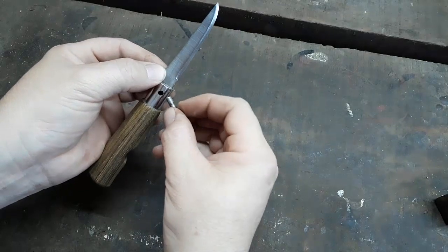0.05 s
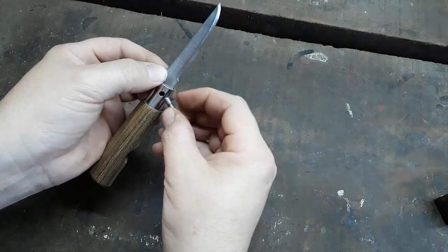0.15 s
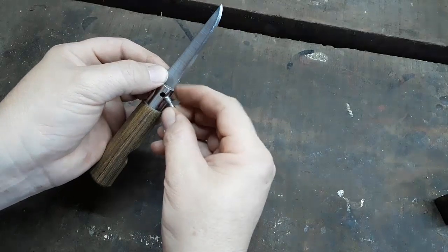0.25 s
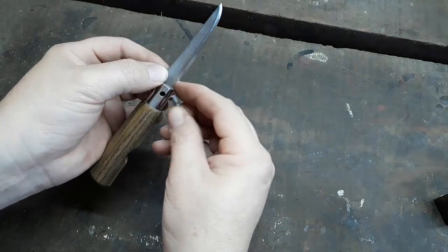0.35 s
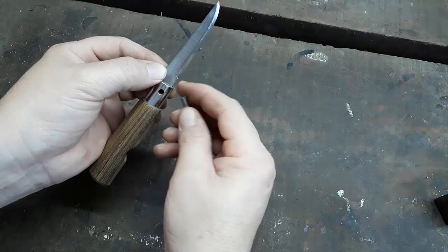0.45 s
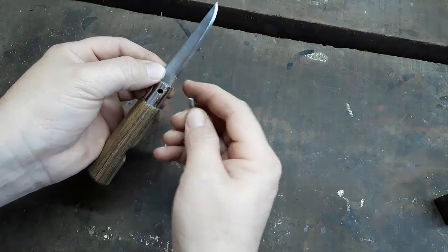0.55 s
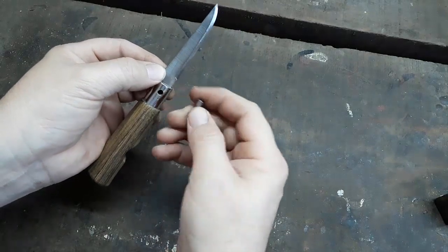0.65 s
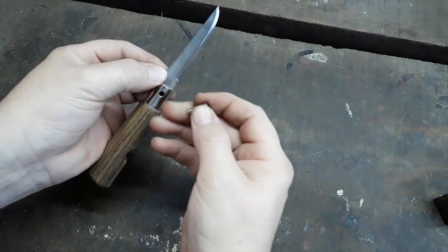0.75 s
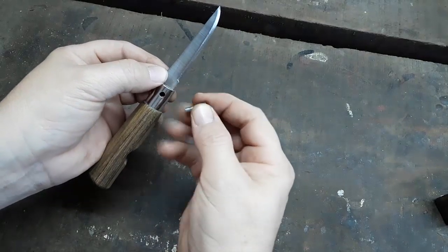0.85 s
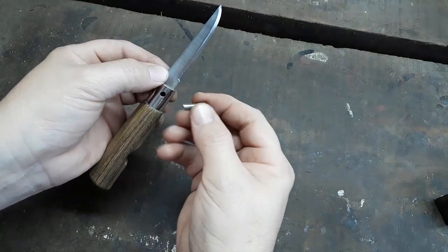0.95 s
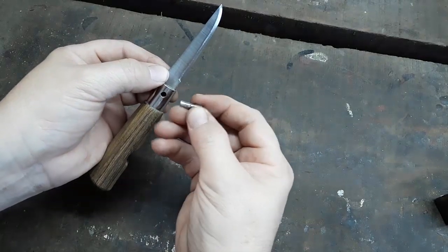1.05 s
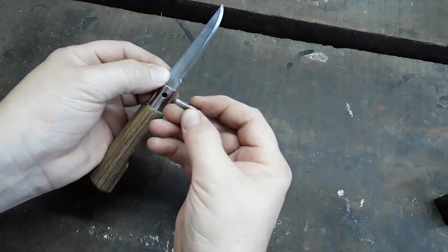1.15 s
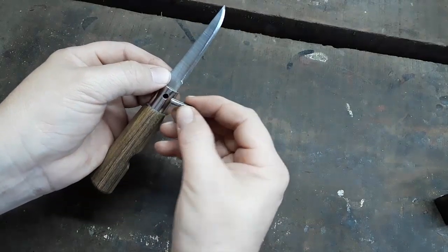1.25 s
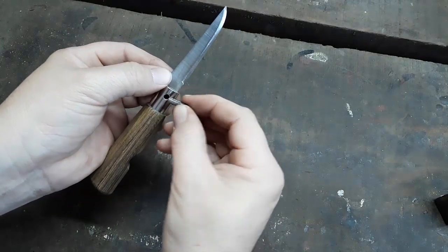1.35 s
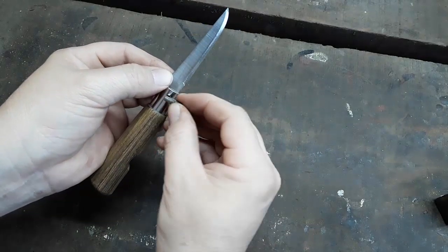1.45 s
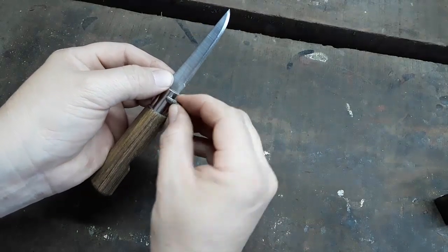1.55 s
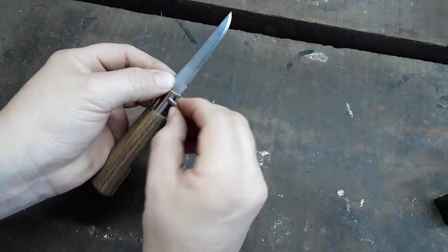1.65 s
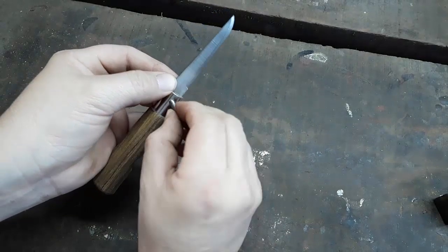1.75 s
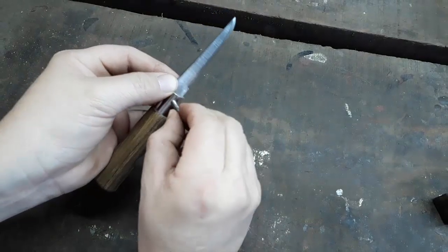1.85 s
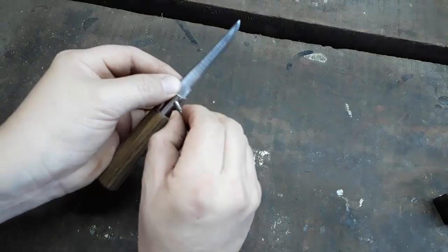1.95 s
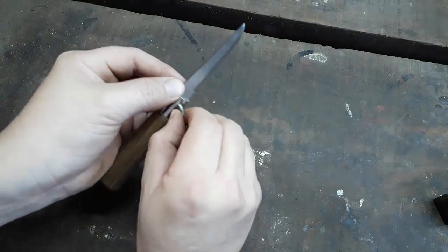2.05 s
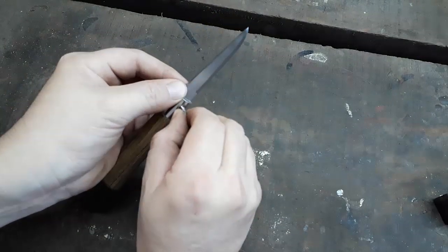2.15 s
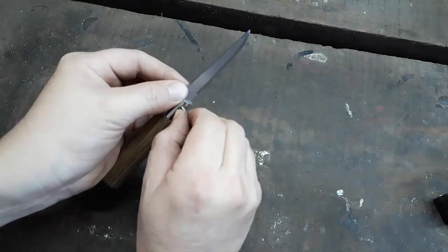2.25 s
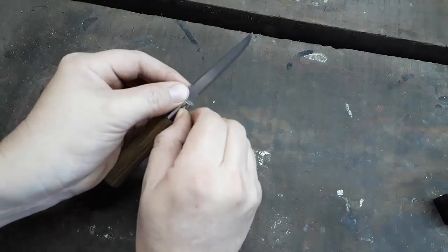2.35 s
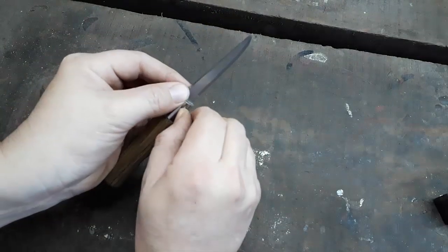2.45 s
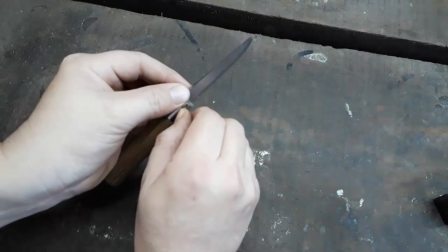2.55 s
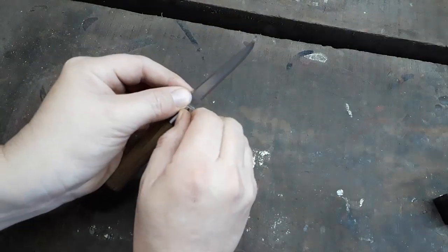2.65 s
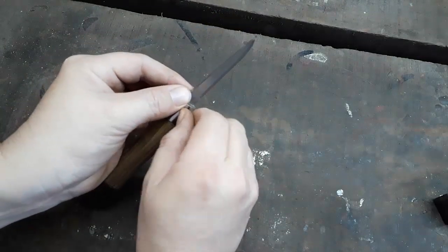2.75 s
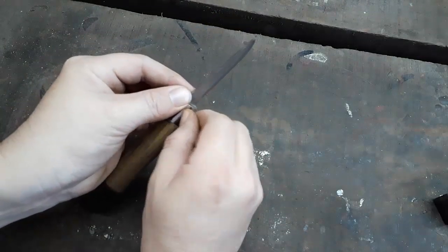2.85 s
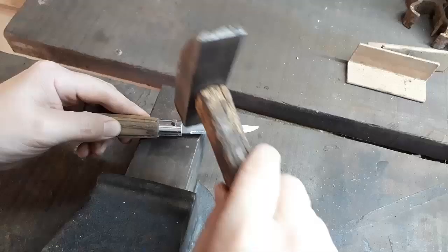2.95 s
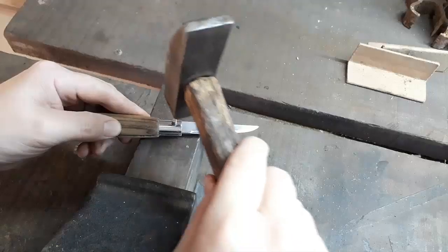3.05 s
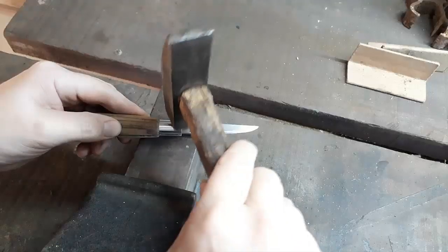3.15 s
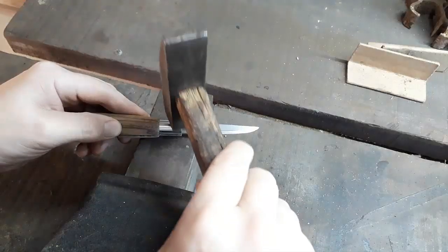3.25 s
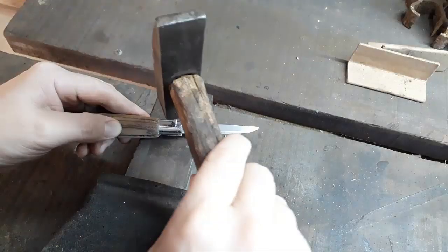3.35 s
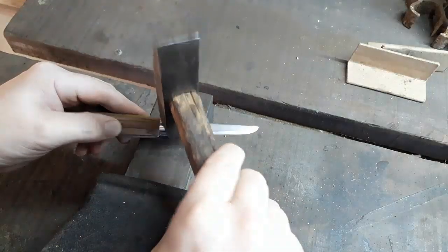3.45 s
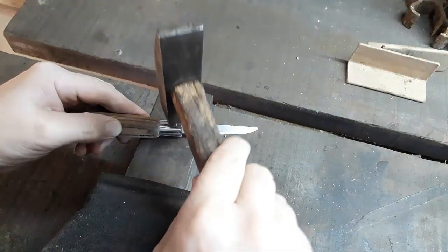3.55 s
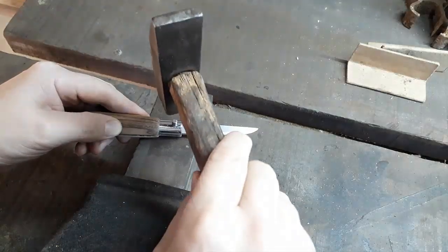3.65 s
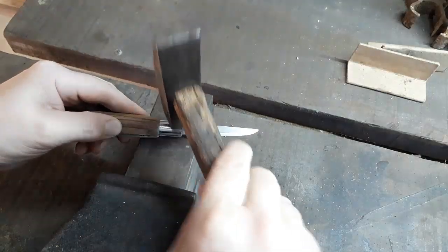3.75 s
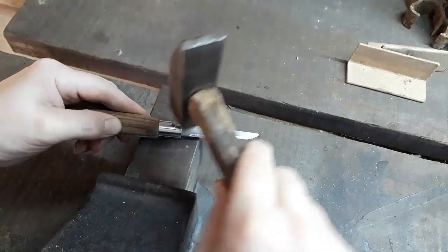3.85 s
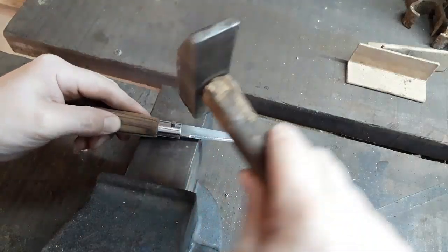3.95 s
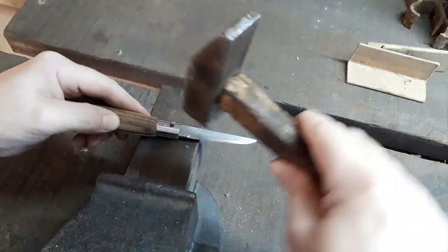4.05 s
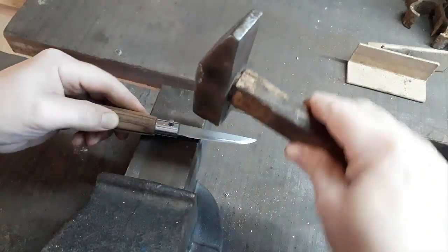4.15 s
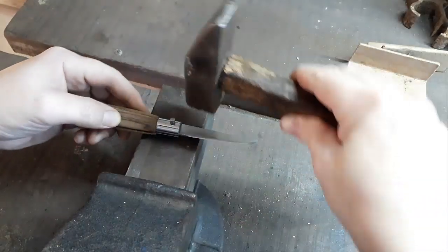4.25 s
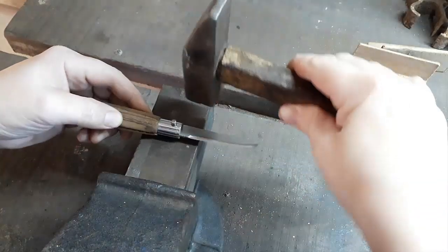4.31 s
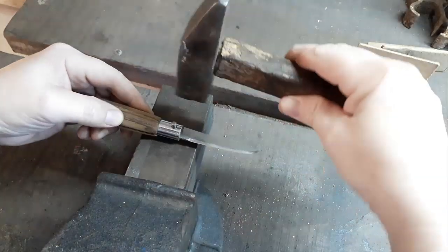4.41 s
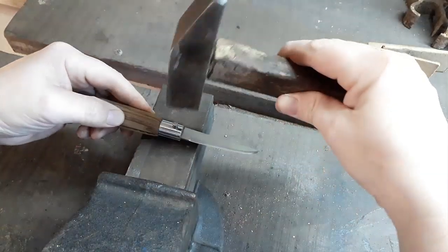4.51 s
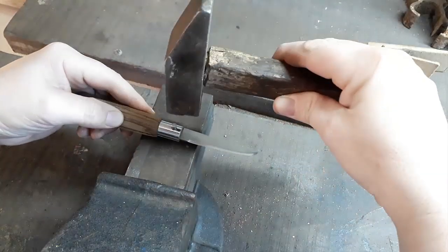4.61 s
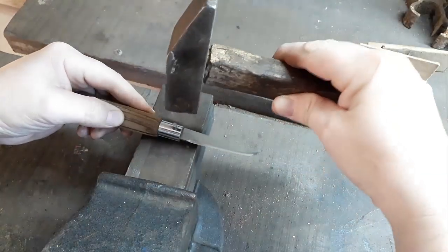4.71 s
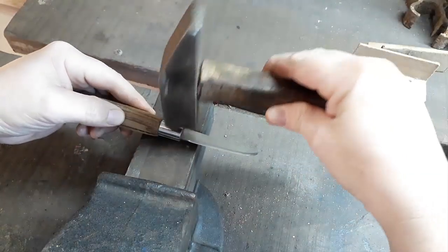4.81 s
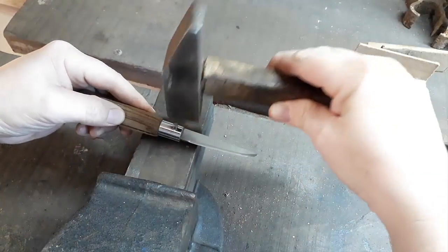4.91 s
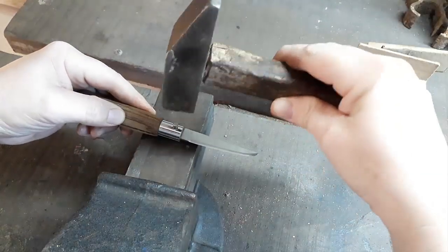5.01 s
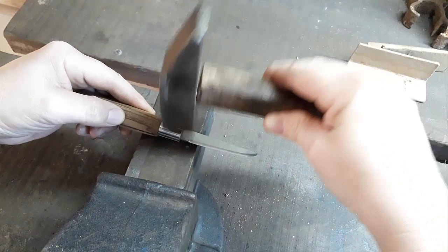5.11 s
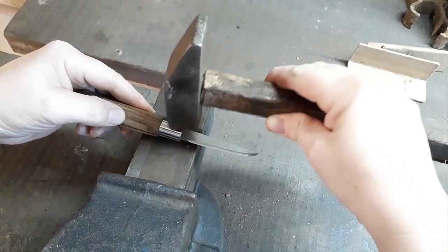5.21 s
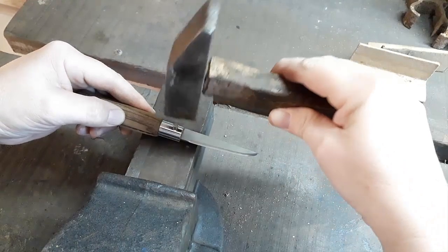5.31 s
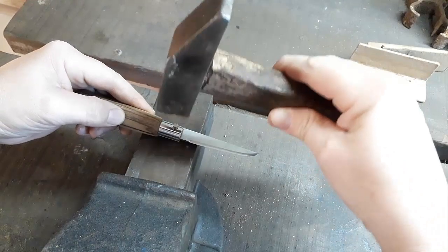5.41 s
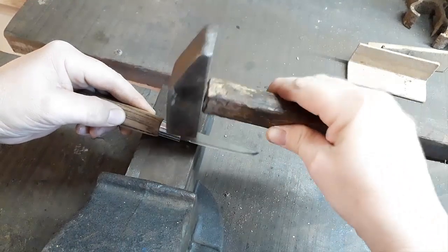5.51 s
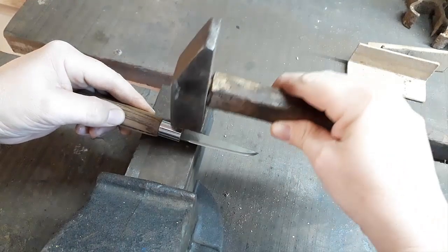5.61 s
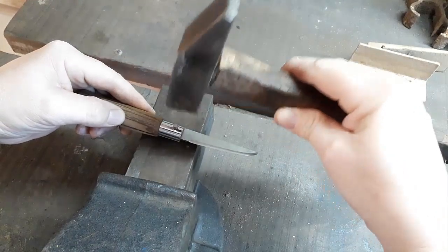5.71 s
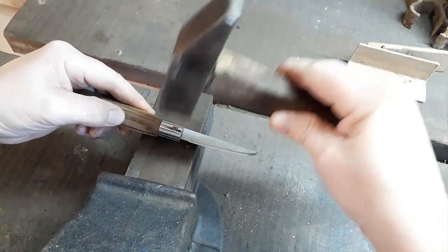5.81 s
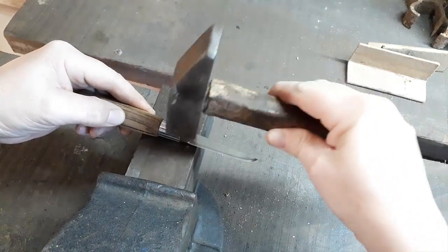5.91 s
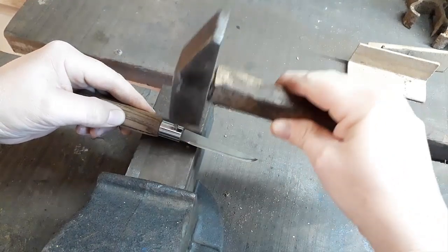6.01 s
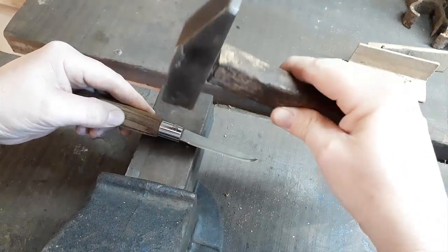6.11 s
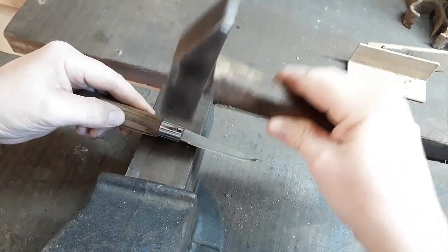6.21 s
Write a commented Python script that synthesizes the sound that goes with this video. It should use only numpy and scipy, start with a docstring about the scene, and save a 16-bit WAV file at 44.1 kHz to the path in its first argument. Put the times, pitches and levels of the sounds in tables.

```python
"""Hammering a pin into a folding knife

A metal pin is fiddled into the knife's collar with small clicks and scrapes, then hammered home on a
vise. Each impact excites the modes of all it reaches: the clamped steel cracks and chatters, the wooden
bench knocks and the vise rings on faintly. The small, quiet workshop adds a low rumble and faint chirps."""
import sys
import numpy as np
from scipy import signal
from scipy.fft import rfft, irfft, next_fast_len
from scipy.io import wavfile
from scipy.ndimage import uniform_filter1d, map_coordinates

SR = 44100
rng = np.random.default_rng(int(sys.argv[2]) if len(sys.argv) > 2 else 0)


def file_out(sig):
    """Save sig as 16-bit WAV at sys.argv[1]."""
    # one column per channel
    cols = np.atleast_2d(sig).T
    # limit, then scale
    lim = np.clip(cols, -1, 1)
    pcm = np.round(lim * 32767).astype(np.int16)
    wavfile.write(sys.argv[1], SR, pcm)


N = 276507
T = np.arange(int(.8 * SR)) / SR  # time axis of one event
HZ = np.fft.rfftfreq(len(T), 1 / SR)


def amp(db):
    """Amplitude grows tenfold every 20 dB."""
    return 10 ** (np.asarray(db) / 20)

def unit(x):
    """Normalisation to rms 1."""
    return x / np.sqrt(np.mean(x ** 2) + 1e-20)

def along(points, hz):
    """Interpolation of (Hz, value) points on a logarithmic frequency axis."""
    freqs, values = np.transpose(points)
    return np.interp(np.log(hz + 1), np.log(freqs + 1), values)

def tilt(db_per_octave):
    """Spectral slope in dB, pivoting near 6 kHz."""
    return db_per_octave * np.log2((HZ + 100) / 6000)

def ripple(width_hz):
    """Modal overlap: crowded modes leave random peaks and dips in a spectrum."""
    knots = HZ / width_hz
    return map_coordinates(rng.standard_normal(int(knots[-1]) + 4), [knots])

def fade(t60, t=T):
    """Exponential damping: 60 dB in t60 seconds."""
    return np.exp(-np.log(1000) * t / t60)

def swell(rise_s):
    """First-order onset with the given time constant."""
    return 1 - np.exp(-T / rise_s)

def noise(colour_db):
    """Random phases turn a spectrum into noise of rms 1."""
    return unit(irfft(amp(colour_db) * np.exp(2j * np.pi * rng.random(len(colour_db)))))

def pulse(colour_db):
    """Minimum phase turns a spectrum into its shortest causal click, of peak 1."""
    cepstrum = irfft(np.log(amp(colour_db)))
    click = irfft(np.exp(rfft(2 * cepstrum * (T < T[-1] / 2))))
    return click / np.abs(click).max()

def ring(modes):
    """Modal superposition: damped sines of alternating sign and slightly random strength."""
    hz, db, t60 = np.transpose(modes)[:, :, None]
    polarity = (-1) ** np.arange(len(hz))[:, None]
    gain = amp(db + rng.standard_normal(hz.shape)) * polarity
    return np.sum(gain * np.sin(2 * np.pi * hz * T) * fade(t60), axis=0)

def add(track, start_s, sound):
    """Linear superposition of a sound on a track."""
    part = track[round(start_s * SR):][:len(sound)]
    part += sound[:len(part)]

# Reverberation of the workshop. Each row: frequency in Hz, T60 in seconds.
ROOM_DECAY = [(100, 0.72), (300, 0.17), (700, 0.2), (2000, 0.32), (5500, 0.23), (9000, 0.21), (14000, 0.22)]
def room_decay(x):
    """Absorption depends on frequency, so each band dies away at its own rate."""
    hz, t, bands = signal.stft(x, SR, nperseg=256)
    damped = bands * fade(along(ROOM_DECAY, hz)[:, None], t)
    return signal.istft(damped, SR, nperseg=256)[1][:len(T)]

# Spectrum of the background. Each row: frequency in Hz, relative level in dB.
AIR_SPECTRUM = [(25, -21.5), (45, -17), (75, -3), (165, -1.5), (220, -10), (450, -13), (1200, -17),
                (1700, -21), (4000, -23), (6000, -31), (9000, -35), (15000, -34.5), (16000, -45)]
# Slow rise of the background. Each row: time in seconds, level in dB.
AIR_LEVEL = [(0, -69), (3.001, -69), (4.403, -66.5), (6.27, -66)]
def room_tone():
    """Broadband ambient noise: a low rumble and a thin hiss."""
    hz = np.fft.rfftfreq(2 * next_fast_len(N // 2 + 1), 1 / SR)
    level_db = np.interp(np.arange(N) / SR, *np.transpose(AIR_LEVEL))
    return amp(level_db) * noise(along(AIR_SPECTRUM, hz))[:N]

# Faint chirps. Each row: start and length in seconds, first and last pitch in Hz, level in dB.
CHIRP_GLIDES = [(0.638, 0.1, 1940, 2070, -75), (0.842, 0.073, 3180, 2920, -70),
                (0.916, 0.065, 4340, 3400, -63.5), (4.56, 0.11, 1950, 2050, -80)]
def chirps(rasp=.02, rasp_per_octave=0.097, subharmonic_db=-8.5):
    """Random frequency modulation roughens each glide, wide ones most; reverberation blurs them."""
    track = np.zeros(N)
    for start_s, length_s, first_hz, last_hz, db in CHIRP_GLIDES:
        n = int(length_s * SR)
        depth = rasp + rasp_per_octave * abs(np.log2(last_hz / first_hz))
        waver = depth * unit(uniform_filter1d(rng.standard_normal(len(T)), size=60))[:n]
        pitch = np.linspace(first_hz, last_hz, n) * (1 + waver)
        phase = 2 * np.pi * np.cumsum(pitch) / SR
        tone = np.sin(phase) + amp(subharmonic_db) * np.sin(phase / 2)
        add(track, start_s, amp(db) * tone * np.sin(np.linspace(0, np.pi, n)))
    tail = room_decay(rng.standard_normal(len(T)))
    return track + .5 * signal.fftconvolve(track, tail / np.linalg.norm(tail))[:N]

# Spectrum of steel, scraped or struck. Each row: frequency in Hz, relative level in dB.
STEEL_SPECTRUM = [(300, -22), (1500, -12.5), (2300, -15), (3700, -12), (4600, -3.5), (6200, 0),
                  (7900, -1.5), (9000, -5), (10300, -13), (12800, -14), (14800, -16.5), (15300, -12.5),
                  (16200, -30)]
# Light drags of steel on steel. Each row: start in seconds, length in seconds, level in dB.
SLIDE_STROKES = [(0.754, 0.083, -74.5), (1.44, 0.4, -86), (3.979, 0.13, -68.5), (4.099, 0.35, -83)]
def slides(catches_per_s=500):
    """Sliding friction: the surfaces catch in tiny random impulses that excite the steel."""
    track = np.zeros(N)
    for start_s, length_s, db in SLIDE_STROKES:
        n = min(int(length_s * SR), len(T))
        catches = rng.standard_normal(len(T)) * (rng.random(len(T)) < catches_per_s / SR)
        colour = along(STEEL_SPECTRUM, HZ) + 2 * ripple(width_hz=130)
        scrape = unit(irfft(rfft(catches) * amp(colour)))
        add(track, start_s, amp(db) * scrape[:n] * np.sin(np.linspace(0, np.pi, n)))
    return track

# Spectrum of knocked wood. Each row: frequency in Hz, relative level in dB.
WOOD_SPECTRUM = [(30, -32), (70, -9), (170, -6.5), (330, 5), (720, -1), (880, -5), (1300, -7.5),
                 (1900, -21.5), (3000, -20), (6000, -33.5)]
def wood_noise(shading_db=0):
    """The broad, overlapping resonances of wood merge into dull noise."""
    return noise(along(WOOD_SPECTRUM, HZ) + shading_db)

# Spectrum of the pin's click. Each row: frequency in Hz, relative level in dB.
PIN_SPECTRUM = [(100, -38), (400, -26), (1700, -22), (2500, -13), (3800, -6), (4800, -7), (6000, -4),
                (7300, 3), (8500, -8), (11000, -16), (15500, -21)]
# Light contacts of pin, knife and hammer. Each row: time in seconds, strength in dB.
LIGHT_CONTACTS = [(0.775, -54), (1.5986, -45.5), (1.8057, -58), (1.928, -39.5), (2.0686, -29.5),
                  (2.1339, -43.5), (2.6432, -22.5), (2.9698, -62), (4.5024, -57)]
def touches(graze_s=0.0034, blade_hz=3970, blade_half_width_hz=210):
    """Light impacts, damped by the fingers: the harder the contact, the brighter its click."""
    track = np.zeros(N)
    blade_resonance = -20 * np.log10(1 + ((HZ - blade_hz) / blade_half_width_hz) ** 2)
    for start_s, db in LIGHT_CONTACTS:
        colour = along(PIN_SPECTRUM, HZ) + tilt(0.08 * (db + 13)) + 2.5 * ripple(width_hz=130)
        for early_s, contact_db in [(graze_s, -19.5), (0, -7.5)]:  # the parts graze, then meet
            click = amp(1.5) * noise(colour) * fade(0.035) * swell(0.00038)
            reverberation = amp(-19) * room_decay(noise(colour))
            add(track, start_s - early_s, amp(db + contact_db) * (click + reverberation))
        handle = amp(-31) * wood_noise(tilt(3)) * fade(0.056)
        free_blade = amp(-28) * noise(blade_resonance) * fade(0.16)
        add(track, start_s, amp(db) * (handle + free_blade))
    return track

# Clear modes of the vise. Each row: frequency in Hz, relative level in dB, T60 in seconds.
VISE_MODES = [(701, 2, .9), (910, -1, 1.1), (1140, -4, .8), (1290, -3, .8), (1437, 1, 1.1), (1550, -3, 1),
              (1820, -8, 1), (2089, -3, 1), (2159, -4, 1), (2309, -4, 1), (2503, -3, 1), (2654, -7, 1),
              (3165, -6, .9), (3273, -8, .9), (4016, -9, .9), (5496, -11, .8), (6056, -12, .8)]
# Envelope of its crowd of other modes. Each row: frequency in Hz, relative level in dB.
VISE_SPECTRUM = [(600, 2.5), (1400, -1), (2400, 4.5), (3500, -9), (6000, -8.5)]
def vise_ring(count=70, crowd_t60_s=.6):
    """Free vibration of cast iron: a few clear modes outlast a crowd of others."""
    hz = np.geomspace(600, 6000, count) * (1 + .015 * rng.standard_normal(count))
    db = along(VISE_SPECTRUM, hz) + 3 * rng.standard_normal(count)
    crowd = np.transpose([hz, db, np.full(count, crowd_t60_s)])
    return (amp(-29) * ring(VISE_MODES) + amp(-31.5) * ring(crowd)) * swell(.004)

# Modes of the bench top. Each row: frequency in Hz, relative level in dB, free T60 in seconds.
TOP_MODES = [(322, -5, .16), (335, -.5, .17), (402, -7, .16), (470, -14, .14), (505, -13, .14),
             (628, -2, .14), (702, 2, .2), (745, 1, .15), (1112, -5, .21), (1225, -7, .18), (1283, -6, .18)]
# Low modes of the bench frame. Each row: frequency in Hz, relative level in dB, T60 in seconds.
FRAME_MODES = [(79.2, -17, 0.65), (91, -11, 0.48), (129, -7, 0.14), (142, -14.5, 0.24), (164.5, -3, .33),
               (186.8, -2.5, 0.31), (236.5, -7.5, .24), (293.6, -5, 0.18)]
def bench(knock_db, thump_db, centre_hz, boards, grip_t60_s=0.52):
    """Structure-borne sound: a blow passes through the vise, so the top knocks and the frame thumps."""
    favoured = [(hz, db - 6 * abs(np.log2(hz / centre_hz)), t60) for hz, db, t60 in TOP_MODES]
    top = amp(4) * ring(favoured) * swell(0.0064) * fade(grip_t60_s)  # the holding hand adds damping
    loose_parts = wood_noise(4 * ripple(width_hz=45))
    clatter = amp(-2.5) * unit(boards + 0.6 * loose_parts)
    frame = ring(FRAME_MODES) * swell(0.019)
    knock = top + room_decay(clatter) * swell(0.0015)
    build_up = np.interp(T, [.005, .008], [.6, 1])  # first reflections return through the bench
    return amp(knock_db) * knock * build_up + amp(thump_db) * frame

# Modes of the clamped knife. Each row: frequency in Hz, relative level in dB, T60 in seconds.
KNIFE_MODES = [(4686, 1, .13), (4916, -3, .13), (5259, -4, .16), (5336, -2, .18), (5563, -2, .15),
               (5905, 0, .14), (6210, -2, .14), (7190, -3, .12), (7850, -4, .12)]
def steel_clash(chatter_db, pin_hz, slope, pin_half_width_hz=300):
    """Impulsive excitation: the pin cracks, the knife rings briefly and chatter fills the room."""
    colour = along(STEEL_SPECTRUM, HZ) + tilt(slope)
    pin_resonance = 4 / (1 + ((HZ - pin_hz) / pin_half_width_hz) ** 2)
    resonant = colour + pin_resonance + 3 * ripple(width_hz=70)
    crack = amp(17.5) * pulse(colour) + amp(3.5) * noise(colour) * fade(.007) * swell(.0002)
    clash = amp(3) * noise(resonant) * fade(0.06) * swell(0.0005)
    knife = amp(chatter_db - 10) * ring(KNIFE_MODES) * swell(.002)
    chatter = amp(chatter_db - 2.5) * room_decay(noise(resonant)) * swell(0.0055)
    far_walls = amp(chatter_db - 26) * noise(resonant) * fade(0.6) * swell(.02)
    return crack + clash + knife + chatter + far_walls

# Modes of the hammer head. Each row: frequency in Hz, relative level in dB, T60 in seconds.
HEAD_MODES = [(9345, 0, .075), (11320, -17, .1), (13245, -16, .085), (15195, -8.5, .11)]
def hammer_ping():
    """A stiff, compact body has high natural frequencies: the head pings on a square hit."""
    return ring(HEAD_MODES) * swell(0.0022)

# Hammer blows, the faint one a rebound. Each row: start in seconds, strength in dB, firmness of the knife
# on the jaw from 0 to 1, ping in dB relative to strength, pin resonance in Hz, slope in dB per octave.
HAMMER_BLOWS = [(3.2302, -29.5, 0, -30, 7170, -2.1), (3.4887, -23, .8, -33, 5280, -4),
                (3.8135, -22.5, .85, -23, 4920, -2), (4.9169, -24, .3, -4.5, 4560, -2),
                (5.2025, -22, 1, 3, 5300, -2.5), (5.2815, -40.5, .3, -25, 5200, -3.5),
                (5.574, -21, .95, -6, 5900, -3), (5.945, -23, 1, -8, 4750, -2)]
def hammer_blows():
    """Mechanical coupling: the firmer the knife lies, the more of a blow reaches vise and bench."""
    track = np.zeros(N)
    boards, vise = wood_noise(), vise_ring()  # both answer alike at every blow
    for start_s, db, firmness, ping_db, pin_hz, slope in HAMMER_BLOWS:
        chatter_db = np.interp(firmness, [0, 1], [-10.5, -4])
        knock_db = db + np.interp(firmness, [0, 1], [-5, -2.5])
        thump_db = db + np.interp(firmness, [0, 1], [-29, -8])
        knock_hz = 740 * 2 ** (0.3 * slope)  # a duller contact favours lower bench modes
        add(track, start_s, amp(db) * steel_clash(chatter_db, pin_hz, slope))
        add(track, start_s, amp(db + ping_db) * hammer_ping())
        add(track, start_s, bench(knock_db, thump_db, knock_hz, boards) + amp(thump_db) * vise)
    return track

def scene():
    """Sound pressures add at one close microphone."""
    return (hammer_blows() + touches() + slides() + chirps() + room_tone())[None]

def record(dry, low_hz=40, top_hz=16300):
    """Band limiting: the small microphone loses the lowest bass, and a steep low-pass cuts the top."""
    thin = signal.sosfilt(signal.butter(2, low_hz, "high", fs=SR, output="sos"), dry)
    return signal.sosfilt(signal.ellip(10, .1, 90, top_hz, fs=SR, output="sos"), thin)

dry = scene()
out = record(dry)
file_out(out)
```